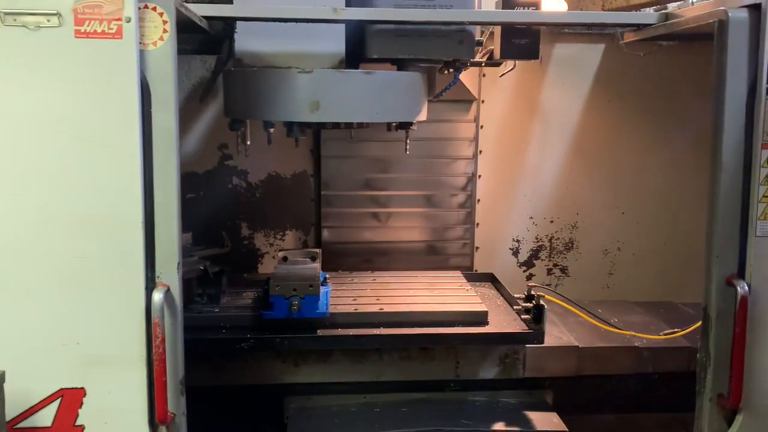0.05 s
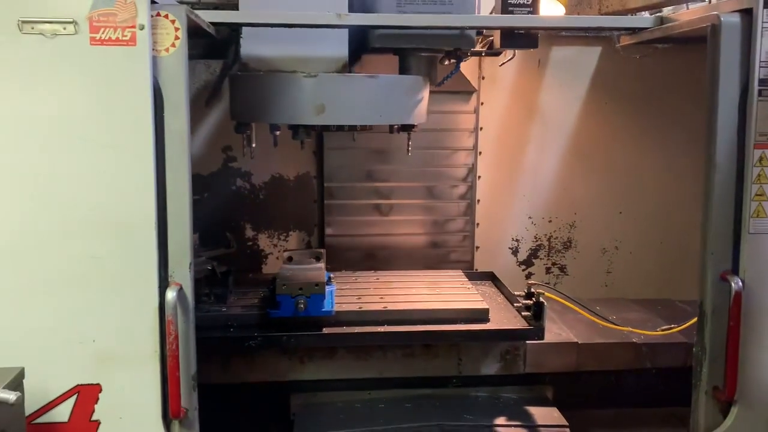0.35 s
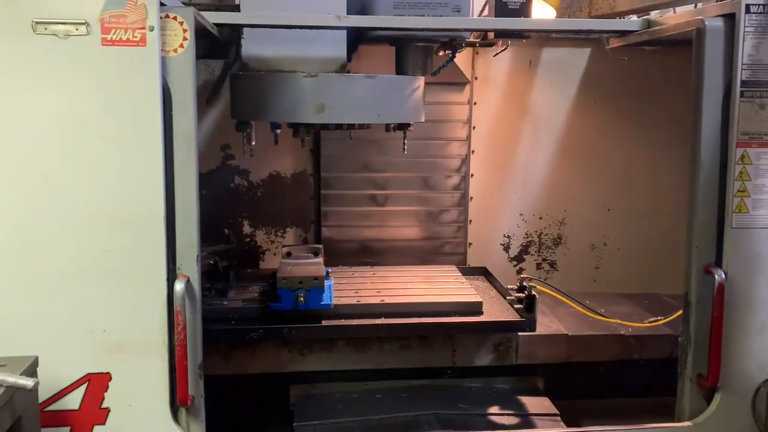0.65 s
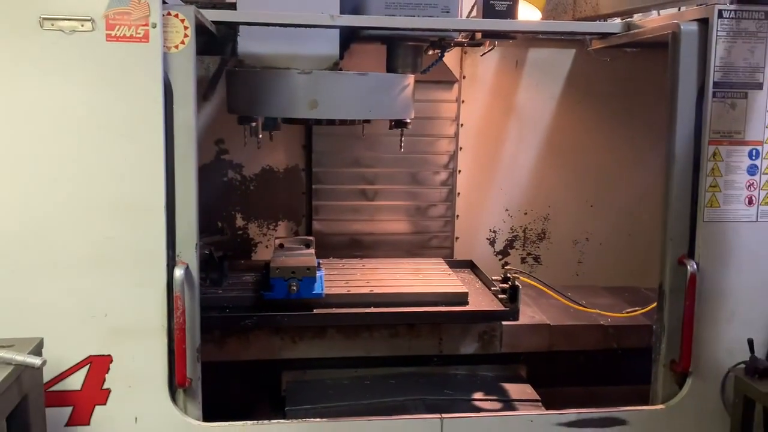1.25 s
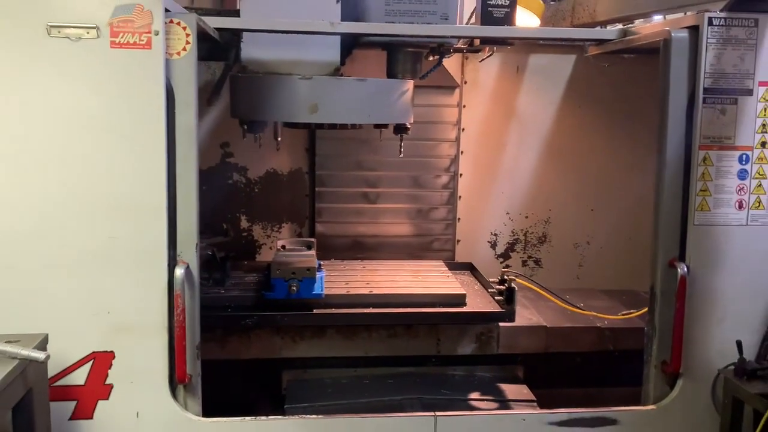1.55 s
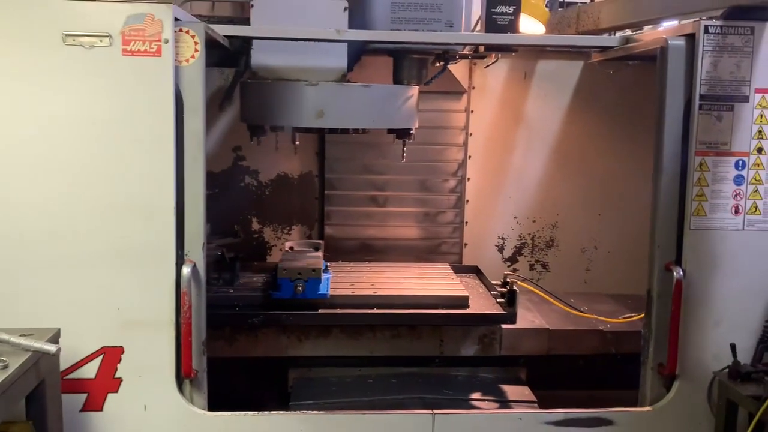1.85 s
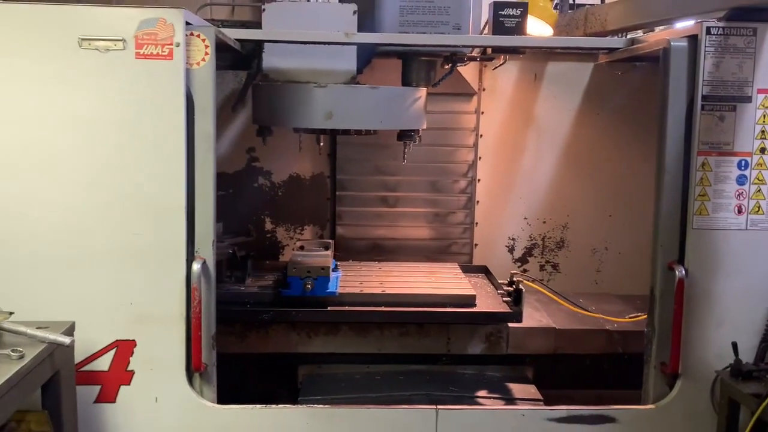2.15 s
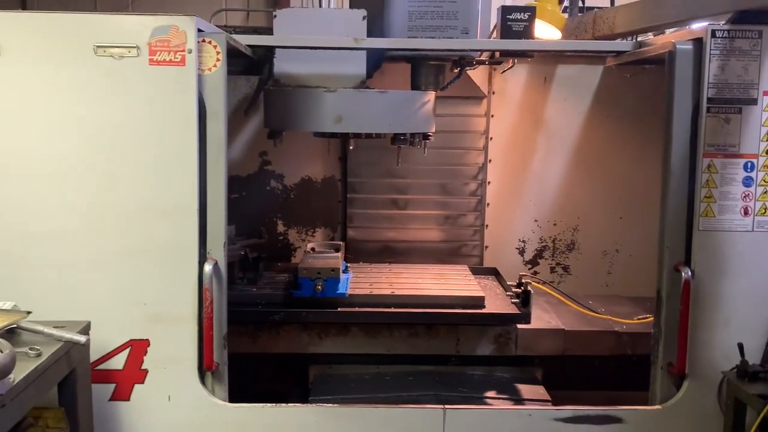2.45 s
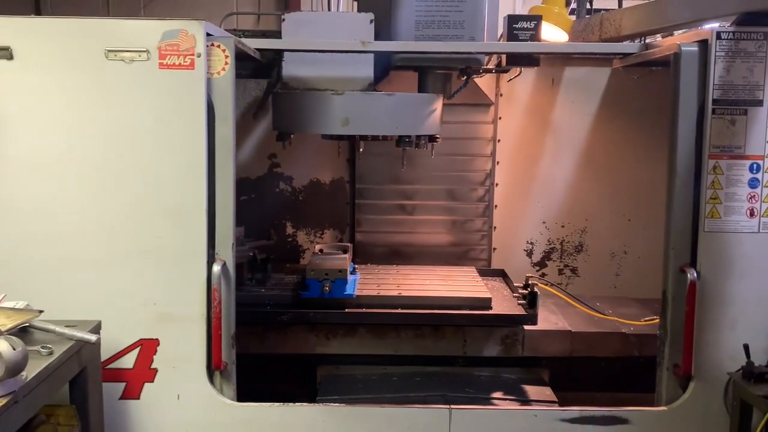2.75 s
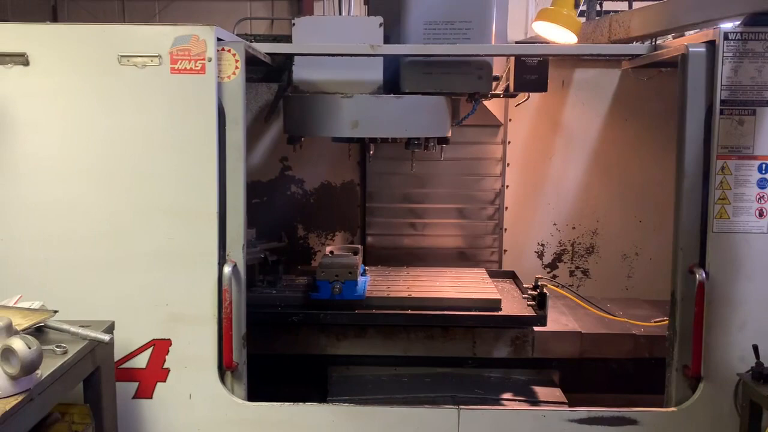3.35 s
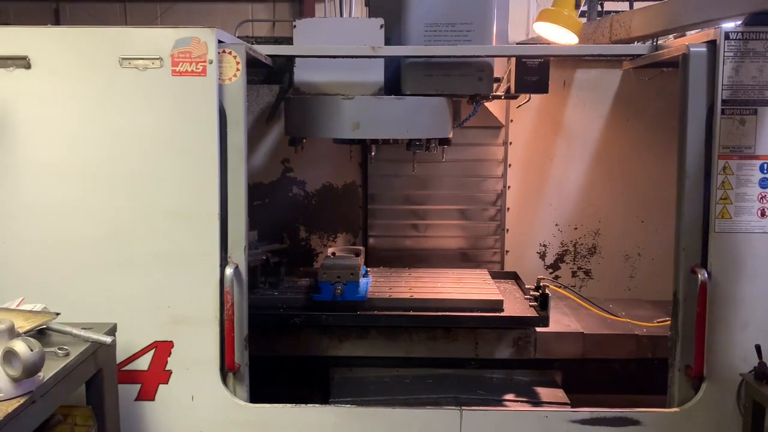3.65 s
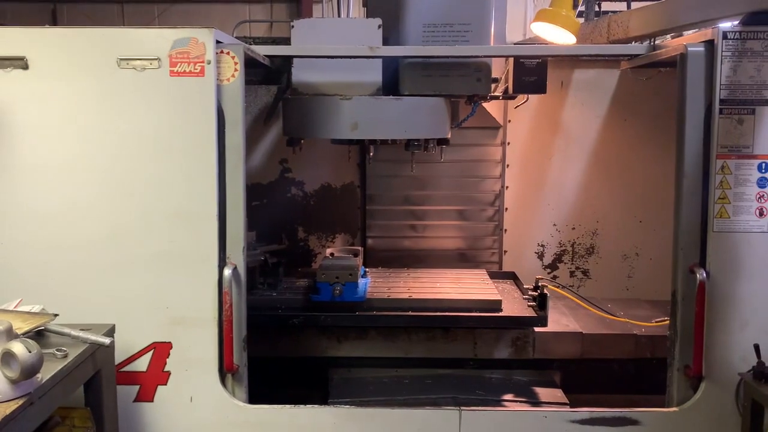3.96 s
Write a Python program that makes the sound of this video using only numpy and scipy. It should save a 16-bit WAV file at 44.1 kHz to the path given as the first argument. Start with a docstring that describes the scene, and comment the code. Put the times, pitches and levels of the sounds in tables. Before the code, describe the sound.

A loud jet of air roars in a workshop machine, ending with a rattling thump.

```python
"""A workshop, at the open door of a machining centre, with a stereo microphone pair.
Compressed air blows inside the steel enclosure, which colours its sound. The jet roars, sizzles and
whistles; the whistle sags as the air runs down, the valve shuts and the mechanism lands with a thump
and a rattle. Motors rumble and hum under it all."""
import sys
import numpy as np
from scipy import signal
from scipy.fft import rfft, irfft
from scipy.io import wavfile

SR = 44100
rng = np.random.default_rng(int(sys.argv[2]) if len(sys.argv) > 2 else 0)


def transcribe(signal):
    """Save signal, clipped to [-1, 1], as a 16-bit WAV file at the path in sys.argv[1]."""
    frames = np.atleast_2d(signal).T
    limited = np.clip(frames, -1, 1)
    pcm = np.round(limited * 32767).astype(np.int16)
    wavfile.write(sys.argv[1], SR, pcm)


N = 176400
T = np.arange(N) / SR
FFT, HOP = 2048, 512
HZ, FRAME_S = np.fft.rfftfreq(FFT, 1 / SR), np.arange(N // HOP + 5) * HOP / SR
SHUT_S, ROAR_T60_S, HISS_T60_S = 3.566, 0.99, 0.41
SINCE_SHUT_S = np.maximum(T - SHUT_S, 0)


def jet(box):
    """Turbulent roar and hiss follow the air flow and die away once the valve shuts."""
    # air flow (time [s], roar gain [dB], hiss gain [dB])
    flow = [(0, 4, 2), (.04, 3.5, 3), (.2, 5.3, 4.5), (.32, 6.5, 4.5), (.342, 5.5, 4.5), (.365, 3, 1.5),
            (.6, 2.5, 3), (.75, 1.5, 0.5), (.9, 0, 1.4), (1.05, 0, -0.1), (1.17, 0.5, 0.5),
            (1.47, -0.7, 0.1), (1.75, -0.4, 1.1), (2.45, 0.16, 0.4), (2.88, 0.2, 0), (3.05, -0.2, -0.5),
            (3.15, 0, 1), (3.235, -2.5, 1), (3.29, -9, -4.5), (3.42, -16, -8), (3.56, -17, -12.5)]
    # spectra of the bare jet (frequency [Hz], density [dB/Hz])
    roar_spectrum = [(200, -100), (500, -81.5), (620, -75), (850, -81.5), (1000, -72.5), (1500, -72),
                     (1830, -75.5), (2050, -66.5), (2200, -68), (2600, -63), (3000, -64.5), (3600, -62),
                     (4600, -64.5), (5400, -72), (7000, -85.5), (10000, -97), (16000, -115)]
    hiss_spectrum = [(1500, -105), (3000, -87), (5000, -79.5), (6500, -72), (7400, -72), (8200, -71.5),
                     (9000, -63), (9900, -64.5), (10400, -65), (11400, -63.5), (11900, -68.5),
                     (12500, -73.5), (13400, -72), (14500, -69), (15200, -78), (16000, -72)]
    roar_db, hiss_db = over_time(flow, T)
    flutter_db = 0.3 * wander(rate_hz=50)
    roar = pair_noise(over_hz(roar_spectrum) + box + 1.9 * patches(width_hz=210, length_s=0.043))
    hiss = pair_noise(over_hz(hiss_spectrum) + box + 2.5 * patches(width_hz=260, length_s=0.019))
    return (roar * amp(roar_db + flutter_db - 60 * SINCE_SHUT_S / ROAR_T60_S)
            + hiss * amp(hiss_db - 60 * SINCE_SHUT_S / HISS_T60_S))


def stream_resonances(box):
    """Four moving resonances of the air stream; they die away once the valve shuts."""
    # each (time [s], centre [Hz], level [dB])
    swish = [(2.85, 6944, -64), (3.08, 6700, -33.5), (3.21, 6190, -31.5), (3.28, 5670, -43),
             (3.4, 5400, -41), (3.55, 5200, -44), (3.8, 5030, -68)]  # bright flare as the air runs out
    sizzle = [(0, 12100, -43), (.35, 11840, -28.5), (.65, 11650, -32), (.95, 11400, -34),
              (1.25, 11200, -27.5), (1.5, 11450, -33.5), (2, 11240, -33), (2.6, 11450, -33),
              (2.87, 11320, -29.5), (3.2, 11400, -39), (3.55, 11400, -68)]  # thin band on top of the hiss
    shrill = [(0, 4350, -31.5), (.3, 4330, -30.5), (.4, 4240, -44), (.9, 4270, -71)]  # edge of the opening blast
    moan = [(2.3, 2420, -47), (2.65, 2330, -37), (3, 2290, -36.5), (3.17, 2400, -41), (3.32, 2380, -54.5)]  # hollow note as the whistle sinks
    out = np.zeros((2, N))
    for curve, half_width_hz in (swish, 910), (sizzle, 290), (shrill, 62), (moan, 67):
        hz, db = over_time(curve, T)
        out += band(hz, half_width_hz, box) * amp(db - 60 * SINCE_SHUT_S / ROAR_T60_S)
    return out


def whistle(box, waver_hz=11.08, flutter_db=0.6, unsteady=0.66):
    """The jet's wavering tone in a skirt of noise; its pitch sinks with the air pressure."""
    # course of the whistle (time [s], pitch [Hz], level [dB], tone's share of the power [0-1])
    course = [(0, 1110, -43, 0), (.13, 1102, -38, 0.3), (.22, 1092, -36.5, 1), (.55, 1088, -38, 1),
              (.85, 1080, -42.5, 0.65), (1.15, 1085, -41, 1), (1.28, 1094, -36.5, 0.83),
              (1.5, 1080, -44, 0.4), (1.95, 1131, -40, 0.59), (2.5, 1120, -44, 0.67),
              (2.77, 1104, -41, 0.2), (2.92, 1030, -34, 0.15), (3.0, 1010, -34, 0.63),
              (3.08, 1006, -31.5, 0.7), (3.16, 924, -38.5, 0.6), (3.27, 833, -44.5, 0.2),
              (3.4, 767, -56, 0.2), (3.55, 704, -86.5, 0.05)]
    hz, db, clear = over_time(course, T)
    hz += waver_hz * wander(rate_hz=26.6)
    phasor = np.exp(2j * np.pi * np.cumsum(hz) / SR)
    # level and phase stray separately in each channel
    stray = np.array([wander(rate_hz=7) + 1j * wander(rate_hz=8.9) for _ in range(2)])
    tone = unit((phasor * (1 + unsteady * stray)).real)
    skirt = band(hz, half_width_hz=123, box=box)
    blend = np.sqrt(clear) * tone + np.sqrt(1 - clear) * skirt
    return blend * amp(db + flutter_db * wander(rate_hz=26))


def enclosure(direct=0.07):
    """Colour of the steel box in dB: resonances, and a drifting ripple from its many reflections."""
    # cavity resonances (frequency [Hz], width [Hz], lift [dB])
    cavity = [(1240, 70, 4), (1305, 40, 3), (2040, 70, 3), (2392, 30, 3), (2587, 25, 2), (2751, 20, 3),
              (2838, 18, 3), (3042, 35, 2), (3353, 35, 4), (3640, 80, 2), (4015, 45, 2), (4280, 50, 3),
              (4430, 35, 2), (4588, 45, 4)]
    peaks_db = sum(db / (1 + (2 * (HZ - hz) / width) ** 2) for hz, width, db in cavity)
    reflected = sum(patches(width_hz=22, length_s=0.25) ** 2 for _ in range(2)) / 2
    return peaks_db + 10 * np.log10(direct + (1 - direct) * reflected) + 0.74


def thump(attack_s=0.0053, rattle_t60_s=0.39, room_t60_s=0.47, room_db=-7.5):
    """Each blow of the mechanism rings the panels and shakes loose parts; the workshop answers."""
    # blows (time [s], thud gain [dB], rattle level [dB], roll-off of the panel modes [Hz])
    blows = [(3.528, -24, -41, 400), (3.5423, -14.5, -56, 394), (3.57, -29, -45, 300),
             (3.611, -18, -57, 198), (3.633, -26, -57, 200), (3.666, -21, -61, 125),
             (3.711, -18.5, -43, 125), (3.772, -27, -70, 140), (3.889, -33, -67, 142),
             (3.975, -41, -54, 305)]
    # modes of the enclosure panels (frequency [Hz], relative level [dB], T60 [s])
    panels = [(54, -24, 0.4), (93.6, -8.5, 0.24), (112, -8.5, 0.19), (155.8, -11.5, 0.42),
              (197.6, 2, 0.084), (234, 6, 0.05), (288, -20, 0.24), (343, -22, 0.12)]
    # spectrum of the rattle (frequency [Hz], relative level [dB])
    rattle = [(100, -27), (350, 1), (470, -12), (600, -7), (830, -18), (1300, -12), (3000, -28),
              (6000, -20), (16000, -62)]
    t, out = T[:SR], np.zeros((2, N))
    rise = np.minimum(t / attack_s, 1)
    loose = unit(pair_noise(over_hz(rattle)))
    for s, thud_db, rattle_db, reach_hz in blows:
        ring = sum(amp(db - 60 * t / t60) * np.sin(2 * np.pi * hz * t) / (1 + (hz / reach_hz) ** 4)
                   for hz, db, t60 in panels)
        shake = np.roll(loose, rng.integers(N), axis=1)[:, :SR] * amp(rattle_db - 60 * t / rattle_t60_s)
        add(out, s, rise * (amp(thud_db) * ring + shake))
    tail = rng.standard_normal(SR) * amp(-60 * t / room_t60_s) * np.minimum(t / 0.016, 1)
    room = signal.fftconvolve(out, tail[None] / np.linalg.norm(tail), axes=1)[:, :N]
    return out + amp(room_db) * room


def clacks(box, attack_s=0.01, t60_s=0.21):
    """Loose parts knock, each with its own short, rough ring."""
    # knocks (time [s], pitch [Hz], level [dB])
    knocks = [(3.526, 627, -46), (3.686, 805, -43.5), (3.703, 455, -38), (3.966, 654, -50)]
    t, out = T[:SR], np.zeros((2, N))
    envelope = np.minimum(t / attack_s, 1) * amp(-60 * t / t60_s)
    for s, hz, db in knocks:
        ring = band(np.full(N, hz), half_width_hz=85, box=box)[:, :SR]
        add(out, s, ring * envelope * amp(db))
    return out


def motors(bass_hz=110, waver_db=2):
    """The bed under the air: rumble of machine and workshop, with a faint wavering motor hum."""
    # workshop room tone (frequency [Hz], density [dB/Hz])
    shop = [(18, -118), (31, -100), (40, -77), (47, -62), (60, -86), (72, -78.5), (90, -69.5), (115, -74),
            (155, -67), (195, -71), (228, -65), (275, -70.5), (325, -80.5), (430, -76), (480, -91),
            (800, -84), (1500, -86.5), (3500, -96.5), (6000, -102), (9000, -113), (16000, -130)]
    # swells of the rumble (time [s], gain above the bass [dB], deep bass gain [dB])
    swells = [(0, 7.5, 11), (.2, 2.5, 8), (.5, -2.5, 1), (.75, -3, 7), (1, 0, -2), (1.15, 1.5, -2.5),
              (1.5, -3, -1), (2.1, -0.5, -2), (2.57, -1.5, -6), (2.69, -0.5, 7), (3, -4.5, 1),
              (3.22, -5, 0), (3.48, -4, 9), (4, -2, 3.5)]
    # motor tones (frequency [Hz], rms level [dB])
    tones = [(48.4, -67.5), (140, -57), (299, -64.5)]
    upper_db, bass_db = over_time(swells, FRAME_S)
    deep = 1 / (1 + (HZ / bass_hz) ** 6)
    swell_db = np.outer(upper_db, 1 - deep) + np.outer(bass_db, deep)
    rumble = pair_noise(over_hz(shop) + swell_db + 2.83 * patches(width_hz=42, length_s=0.47))
    hum = sum(amp(db + waver_db * wander(rate_hz=2)) * np.sin(2 * np.pi * (hz * T + rng.random()))
              for hz, db in tones)
    return rumble + np.sqrt(2) * hum


def pair_noise(db):
    """Noise of the given dB per Hz at the microphone pair; the hiss reaches the right side first."""
    # likeness of the two channels (frequency [Hz], coherence [0-1])
    likeness = [(50, 0.93), (250, .99), (600, 0.85), (1200, 0.68), (2200, 0.4), (3500, 0.055),
                (5700, 0.064), (6600, 0.44), (7400, 0.79), (8400, 1), (9600, 1), (10700, 1), (11500, 1),
                (12200, 0.91), (12700, .98), (13900, 1), (14700, .65), (15400, .97)]
    # phase between them (frequency [Hz], lead of the left [rad])
    lead = [(20, 0), (600, -.1), (1200, -.55), (2000, 0), (4500, .6), (6200, .1), (7000, -.65),
            (7700, -2.6), (8500, -3.14), (9100, -3.45), (9800, -4.8), (10500, -6.15), (11400, -6.35),
            (12000, -7.2), (12500, -9.1), (13400, -9.42), (14100, -9.7), (14700, -11.3), (15300, -12.5)]
    a, b, c, d = rng.standard_normal((4, len(FRAME_S), len(HZ)))
    left, unrelated = a + 1j * b, c + 1j * d
    same = over_hz(likeness)
    right = (same * left + np.sqrt(1 - same ** 2) * unrelated) * np.exp(-1j * over_hz(lead))
    spectra = np.array([left, right]) * amp(db) * np.sqrt(1.5 * HZ[1])
    return signal.istft(spectra.transpose(0, 2, 1), nperseg=FFT, noverlap=FFT - HOP)[1][:, :N]


def band(centre_hz, half_width_hz, box):
    """Noise through one resonance that can move, coloured by the enclosure, rms 1."""
    centre = np.interp(FRAME_S, T, centre_hz)[:, None]
    return unit(pair_noise(box - 20 * np.log10(1 + ((HZ - centre) / half_width_hz) ** 2)))


def patches(width_hz, length_s):
    """A smooth random field over time and frequency, rms 1."""
    shape = len(FRAME_S), len(HZ)
    white = np.fft.rfft2(rng.standard_normal(shape))
    along_time = 1 + (2 * length_s * np.fft.fftfreq(len(FRAME_S), FRAME_S[1])) ** 2
    along_hz = 1 + (2 * width_hz * np.fft.rfftfreq(len(HZ), HZ[1])) ** 2
    return unit(np.fft.irfft2(white / along_time[:, None] / along_hz, shape))


def wander(rate_hz):
    """Slow random motion, rms 1."""
    hz = np.fft.rfftfreq(N, 1 / SR)
    return unit(irfft(rfft(rng.standard_normal(N)) / (1 + (hz / rate_hz) ** 2), N))


def over_hz(points):
    """Reads a spectrum on a log-frequency axis."""
    hz, value = np.transpose(points)
    return np.interp(np.log(HZ + 1), np.log(hz + 1), value)


def over_time(rows, t):
    """Reads every column of a curve at the times t."""
    s, *columns = np.transpose(rows)
    return [np.interp(t, s, column) for column in columns]


def add(mix, s, sound):
    """Mixes a sound in at time s."""
    part = mix[:, round(s * SR):][:, :sound.shape[-1]]
    part += sound[..., :part.shape[1]]


def amp(db):
    """Decibels to gain."""
    return 10 ** (np.asarray(db) / 20)


def unit(x):
    """Scales to rms 1."""
    return x / np.sqrt(np.mean(x ** 2) + 1e-20)


def scene():
    """From the open door: air, motors and the closing thump."""
    box = enclosure()
    air = jet(box) + stream_resonances(box) + whistle(box)
    return air + motors() + thump() + clacks(box)


def record(dry):
    """The microphone's low cut and the recorder's band limit."""
    low_cut = signal.butter(4, 44.6, "high", fs=SR, output="sos")
    band_limit = signal.firwin(511, 15700, window=("kaiser", 9), fs=SR)
    return signal.oaconvolve(signal.sosfilt(low_cut, dry), band_limit[None], "same")


dry = scene()
out = record(dry)
transcribe(out)
```